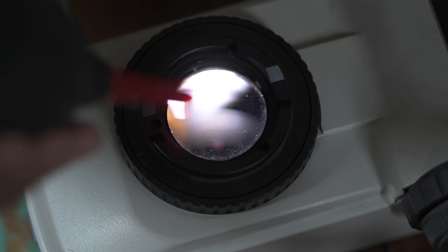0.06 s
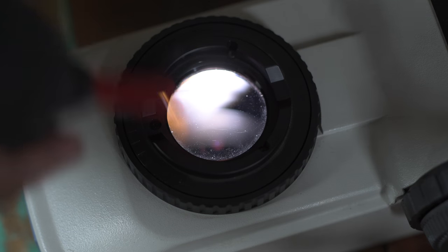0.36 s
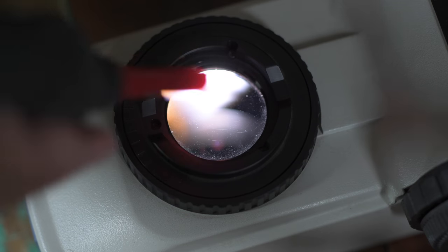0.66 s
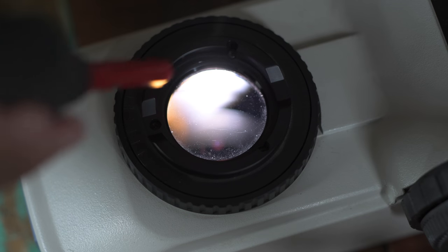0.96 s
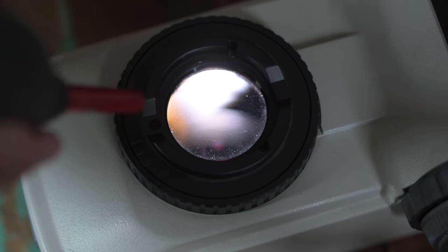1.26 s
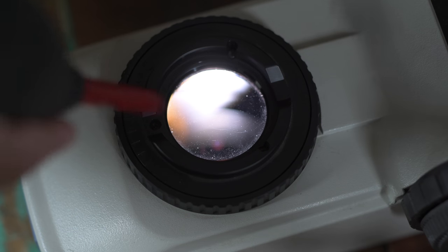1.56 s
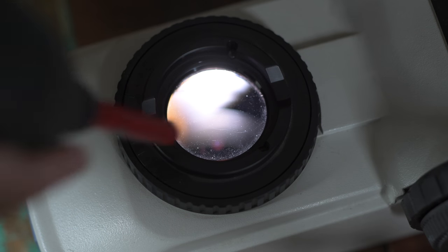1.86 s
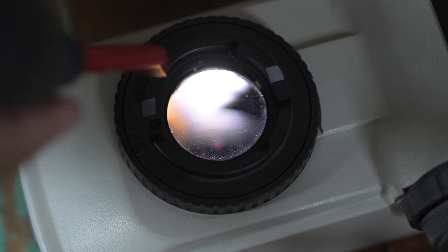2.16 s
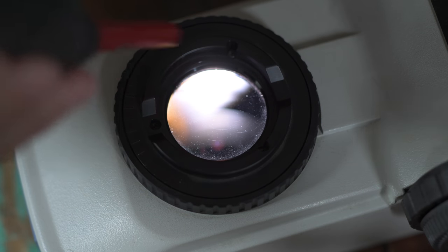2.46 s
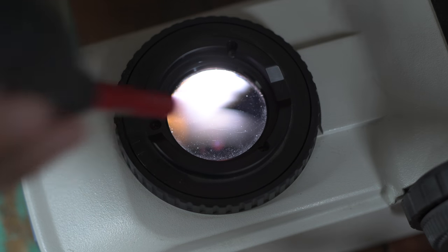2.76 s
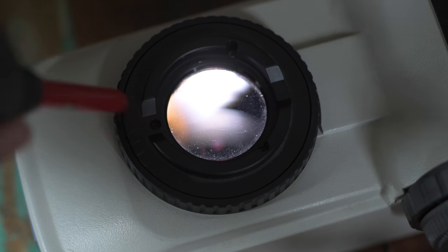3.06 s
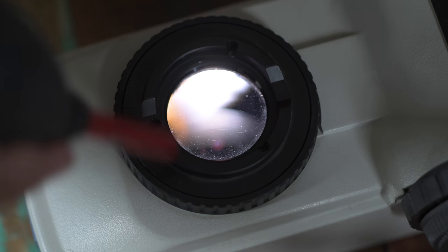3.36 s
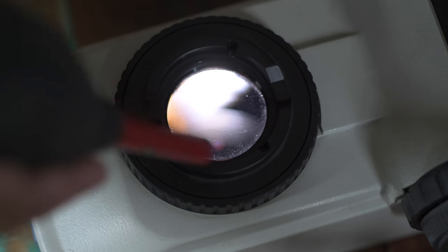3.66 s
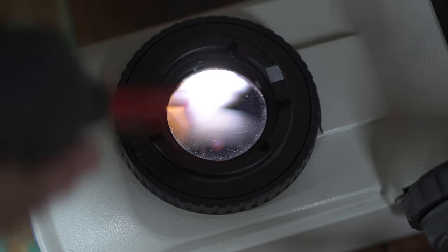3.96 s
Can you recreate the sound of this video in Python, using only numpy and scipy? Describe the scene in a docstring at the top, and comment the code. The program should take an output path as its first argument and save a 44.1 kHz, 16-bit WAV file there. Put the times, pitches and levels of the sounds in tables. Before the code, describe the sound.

Close, short hissing puffs of air from a rubber bulb blower, about three a second.

```python
"""A puff of air hisses over a microscope lens, close by: a rubber bulb blower, squeezed about three
times a second. Each jet flares where it crosses an edge of the mount. On release the bulb sucks air
back through its ringing nozzle and stops short. Near the end the hand knocks softly on the bulb.
The room is small and quiet."""
import sys
import numpy as np
from scipy import signal
from scipy.fft import rfft, irfft
from scipy.io import wavfile

SR = 44100
rng = np.random.default_rng(int(sys.argv[2]) if len(sys.argv) > 2 else 0)


def unload_wav(signal):
    """Save mono or channel-first audio to the path in sys.argv[1] as 16-bit WAV at rate SR, clipped to [-1, 1]."""
    wavfile.write(
        sys.argv[1],
        SR,
        np.round(np.clip(np.atleast_2d(signal).T, -1, 1) * 32767).astype(np.int16),
    )


N = 176400
T, HZ = np.arange(N) / SR, np.maximum(np.fft.rfftfreq(N, 1 / SR), 1)


def undb(db):
    """Decibels to gain."""
    return 10 ** (np.asarray(db) / 20)


def colour(points):
    """Gain at every frequency from (Hz, dB) points."""
    hz, db = np.array(sorted(points)).T
    return undb(np.interp(np.log(HZ), np.log(hz), db))


def peak(hz, width_hz):
    """Gain of one resonance, 1 at its centre."""
    return 1 / np.sqrt(1 + ((HZ / hz - hz / HZ) * hz / width_hz) ** 2)


def ringing(resonances):
    """Gain of narrow resonances standing out of a broad spectrum."""
    return undb(sum(db * peak(hz, width_hz) ** 2 for hz, width_hz, db in resonances))


def unit(gain):
    """Scale a spectrum to keep the power of white noise."""
    return gain / np.sqrt(np.mean(gain ** 2))


def noise(gain):
    """Turbulence with the given spectrum."""
    return irfft(rfft(rng.standard_normal(N)) * gain, N)


def flutter(depth, corner_hz=450):
    """Quick swings of level as eddies pass."""
    eddies = noise(unit(1 / (1 + (HZ / corner_hz) ** 2)))
    return np.exp(depth * eddies - depth ** 2)


def flow(start_s, stop_s, attack_s, release_s):
    """Air flow that eases in and out."""
    ease = lambda u: np.sin(np.pi / 2 * np.clip(u, 0, 1)) ** 2
    return ease((T - start_s) / attack_s) * ease((stop_s - T) / release_s)


def echoes(x, decay_s):
    """Dense reflections that fall to 1/e in decay_s."""
    t = T[:SR // 2]
    tail = rng.standard_normal(len(t)) * np.exp(-t / decay_s)
    return signal.fftconvolve(x, tail / np.sqrt(np.sum(tail ** 2)))[:N]


# Each row: start, length, attack and release in seconds, level in dB, then tint in dB at each TINT_HZ.
SQUEEZES = [(-.11, 0.2, .05, 0.12, -32.5, -1.5, -4, -5.5, -12),
            (.242, 0.18, 0.061, 0.074, -34.5, -1, 0.5, -3.5, -8.5),
            (.578, .19, 0.066, 0.088, -33, -1, 1.5, 0.5, -2), (.912, 0.2, 0.1, 0.1, -37.5, 8, 7, 8.5, 6),
            (1.287, 0.21, 0.12, 0.097, -33, -3.5, 5, 0, 5),
            (1.663, 0.19, .1, .075, -32.5, -5.5, 8, 0.5, 6.5),
            (2.044, .2, 0.12, 0.083, -32.5, 0, 3.5, 2, 0.5),
            (2.402, 0.21, 0.083, 0.09, -33, 3, 2, -3, -0.5), (2.748, 0.19, 0.071, 0.098, -38, 4.5, 6, 6, 1),
            (3.131, 0.18, 0.044, 0.041, -37.5, -2, 5, 5, 7),
            (3.481, 0.21, 0.09, 0.079, -39.5, 2.5, 2, -1, -5),
            (3.836, 0.22, 0.058, 0.099, -32, -3, -4.5, -3, -6)]
TINT_HZ, PIVOT_HZ = (1400, 3200, 5600, 13800), 8900
# Each row: frequency in Hz, relative density in dB.
JET_SPECTRUM = [(100, -25), (350, -24), (480, -17), (700, -19.5), (1200, -16.5), (1550, -8), (2200, -9),
                (2600, -9.5), (3400, -8), (4100, -7), (4600, -12.5), (6200, -8), (7100, 0), (8500, 0),
                (9600, -2), (10300, -2.5), (12000, -11.5), (13000, -10.5), (15800, -12)]
# Each row: centre in Hz, width in Hz, boost in dB.
MOUNT_CAVITIES = [(1808, 35, 7.5), (2220, 140, 2.5), (3500, 80, 5.5), (5390, 54, 4.5), (8500, 150, 3.5),
                  (9130, 110, 1)]
# Each row: lower and upper edge in Hz, flow exponent, lag in seconds.
JET_BANDS = [(20, 6530, 0.92, 0.0051), (6830, 14500, 1.37, -0.0021), (10900, 52000, 1.6, 0.0042)]


def puffs():
    """The jet hisses on the lens; the aim tints each puff, which fills out as the flow grows."""
    out, jet = 0, unit(colour(JET_SPECTRUM) * ringing(MOUNT_CAVITIES))
    lowpass = lambda hz: 1 / (1 + (HZ / hz) ** 12)
    for start_s, length_s, attack_s, release_s, db, *tint_db in SQUEEZES:
        tint = colour([*zip(TINT_HZ, tint_db), (PIVOT_HZ, 0)])
        spectrum = rfft(rng.standard_normal(N)) * jet * tint
        for low_hz, high_hz, exponent, lag_s in JET_BANDS:
            air = flow(start_s + lag_s, start_s + lag_s + length_s, attack_s, release_s)
            band = irfft(spectrum * (lowpass(high_hz) - lowpass(low_hz)), N)
            out += undb(db) * air ** exponent * band
    return out * flutter(depth=0.15)


# Each row: frequency in Hz, reflection gain in dB.
WALL_RESPONSE = [(200, -2), (1500, -1), (5000, 1), (8000, 1), (11000, -2), (15800, -3)]
# Each row: frequency in Hz, relative density in dB.
ROOM_TONE_SPECTRUM = [(20, -4.5), (60, -4), (100, -2), (135, 3), (175, -3.5), (300, -4), (600, -9.5),
                      (1500, -17.5), (5000, -19), (8000, -28), (15800, -37)]


def room(near, reverb_db=-14, t60_s=0.36, tone_db=-67):
    """Short reverberation off the walls over a steady, low room tone."""
    reflected = undb(reverb_db) * irfft(rfft(near) * colour(WALL_RESPONSE), N)
    reverb = echoes(reflected, decay_s=t60_s / np.log(1000))
    return reverb + undb(tone_db) * noise(unit(colour(ROOM_TONE_SPECTRUM)))


# Each row: start and stop in seconds, level in dB, treble gain in dB.
RELEASES = [(0.067, 0.167, -37.5, -2.5), (0.416, 0.518, -38, -2.5), (.76, 0.866, -36.5, -2),
            (1.091, 1.201, -37.5, -2.5), (1.485, 1.6, -37, -2), (1.852, 1.967, -37.5, -1),
            (2.237, 2.354, -37.5, -1.5), (2.595, 2.709, -38, -0.5), (2.939, 3.046, -38.5, -0.5),
            (3.312, 3.429, -39.5, -1), (3.677, 3.796, -39.5, 0)]
# Each row: frequency in Hz, relative density in dB.
SUCTION_SPECTRUM = [(300, -15), (1500, -29), (3500, -14), (5400, -15.5), (6500, -9), (9500, -3.5),
                    (10800, -1), (12300, -5), (13200, -6), (14000, 0.5), (15800, -3)]
# Each row: centre in Hz, width in Hz, boost in dB.
NOZZLE_MODES = [(2344, 450, 15.3), (2910, 110, 10), (4550, 79, 8.3), (5700, 62, 3.3), (6840, 63, 12),
                (7880, 190, 9.5), (8720, 200, 8.1), (10400, 460, 5), (15050, 700, 7.3)]
# Each row: centre in Hz, width in Hz, relative level in dB.
BULB_MODES = [(817, 330, -2.5), (1080, 240, -1), (1480, 130, -2), (1845, 220, -1)]


def refills(hollow_db=-17.5, treble_hz=13500, sag=0.98):
    """The bulb springs back: suction hisses in the nozzle, rings the hollow bulb and stops short."""
    out, nozzle = 0, unit(colour(SUCTION_SPECTRUM) * ringing(NOZZLE_MODES))
    bulb = sum(undb(db) * peak(hz, width_hz) ** 2 for hz, width_hz, db in BULB_MODES)
    hollow = undb(hollow_db) * noise(unit(bulb))
    for start_s, stop_s, db, treble_db in RELEASES:
        second_half = np.clip(2 * (T - start_s) / (stop_s - start_s) - 1, 0, 1)
        air = flow(start_s, stop_s, attack_s=0.05, release_s=0.024) * np.exp(-sag * second_half ** 2)
        hiss = noise(nozzle * colour([(PIVOT_HZ, 0), (treble_hz, treble_db)]))
        out += undb(db) * (air * hiss + air ** 0.96 * hollow)
    return out * flutter(depth=0.02)


# Each row: peak time and half length in seconds, level in dB, centre and width in Hz.
EDGE_CROSSINGS = [(0.304, .012, -44, 5550, 2600), (0.329, 0.0074, -34, 8400, 1800),
                  (.937, 0.0091, -48.5, 2160, 1760), (0.97, 0.026, -38.5, 2400, 1600),
                  (1.017, .024, -29, 2780, 2000), (1.017, 0.014, -31.5, 9800, 3000),
                  (1.386, 0.021, -27.5, 8800, 2000), (1.396, 0.034, -34.5, 6830, 700),
                  (1.739, 0.021, -31.5, 8600, 2600), (1.762, 0.042, -33, 6900, 700),
                  (1.763, 0.043, -37, 13500, 2000), (2.079, 0.01, -44.5, 8800, 2300),
                  (2.136, 0.028, -31.5, 8400, 2420), (2.194, 0.032, -42, 3200, 2120),
                  (2.432, 0.0062, -47, 8500, 2200), (2.519, 0.023, -32, 7500, 1800),
                  (2.528, 0.052, -36.5, 5480, 1110), (2.537, 0.045, -52.5, 880, 700),
                  (2.795, 0.014, -38.5, 3020, 1100), (2.839, 0.027, -23, 8930, 1480),
                  (2.889, 0.0094, -39, 8740, 1700), (3.192, 0.02, -37, 13500, 3460),
                  (3.943, 0.017, -32.5, 8200, 1500), (3.952, 0.037, -40, 3220, 810)]


def edge_flares(skirt_db=-10.5):
    """A rough band flares over broad hiss while the jet crosses an edge of the mount."""
    out, skirt = 0, undb(skirt_db) * unit(colour(JET_SPECTRUM))
    for peak_s, half_s, db, hz, width_hz in EDGE_CROSSINGS:
        band = unit(peak(hz, 2 * width_hz) ** 4)
        swell = np.exp(-np.minimum(((T - peak_s) / half_s) ** 2, 20))
        out += undb(db) * swell * noise(unit(np.hypot(band, skirt)))
    return out * flutter(depth=0.14)


def hand_knock(start_s=3.9, hz=147, decay_s=0.0054, db=-55.5):
    """One dull knock of the hand on the bulb, quickly damped by the rubber."""
    age_s = np.maximum(T - start_s, 0)
    envelope = age_s / decay_s * np.exp(1 - age_s / decay_s)
    return undb(db) * envelope * np.sin(2 * np.pi * hz * age_s)


def scene(stereo_width=0.024):
    """The blower in the centre, with near reflections and the room around it."""
    direct = puffs() + edge_flares() + refills() + hand_knock()
    near = direct + undb(-18) * echoes(direct, decay_s=0.01)  # scatter off microscope and desk
    mid, side = room(near), room(near)
    return near + mid + stereo_width * side * np.array([[1], [-1]])


def record(dry):
    """Steep low-pass at 15.8 kHz."""
    return signal.sosfilt(signal.ellip(12, 0.2, 80, 15800, fs=SR, output="sos"), dry)


dry = scene()
out = record(dry)
unload_wav(out)
```